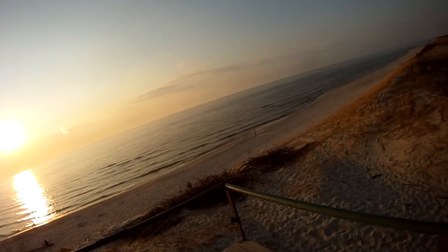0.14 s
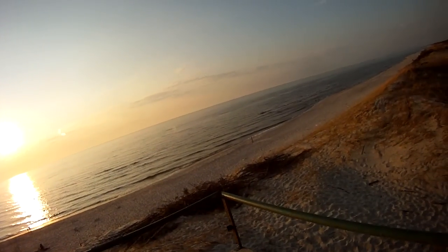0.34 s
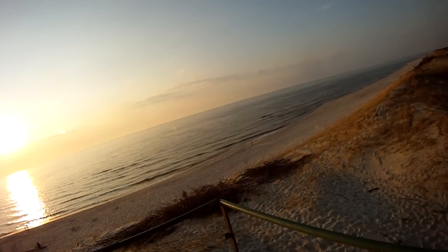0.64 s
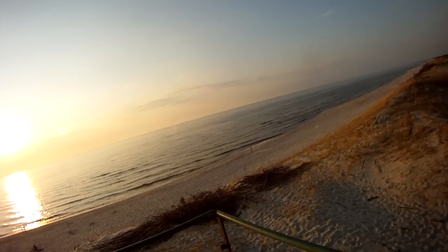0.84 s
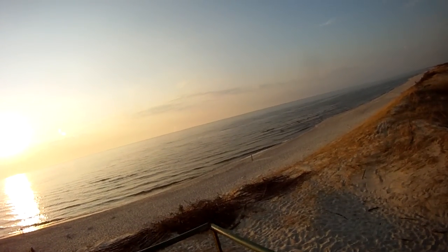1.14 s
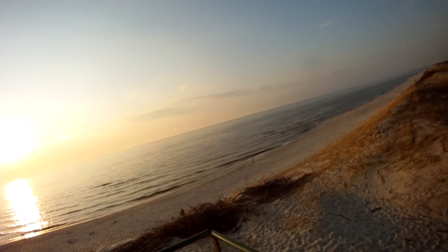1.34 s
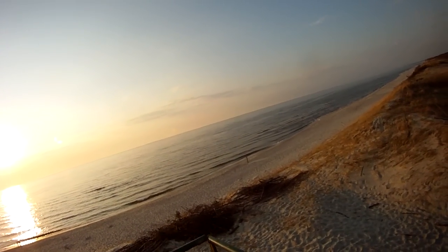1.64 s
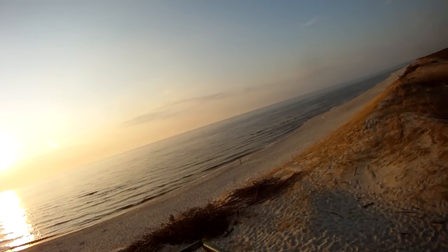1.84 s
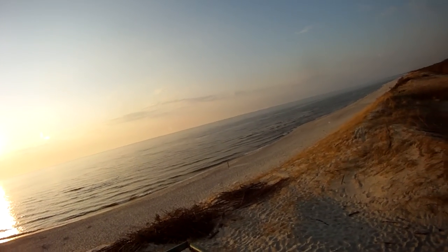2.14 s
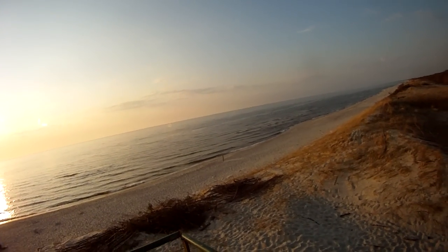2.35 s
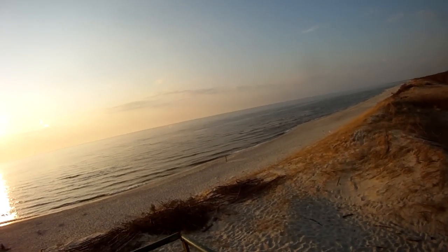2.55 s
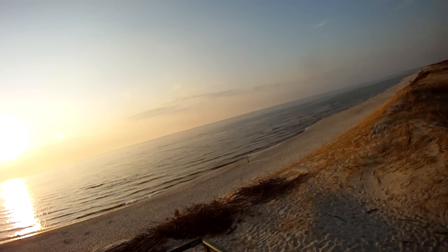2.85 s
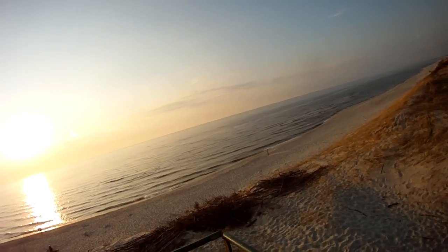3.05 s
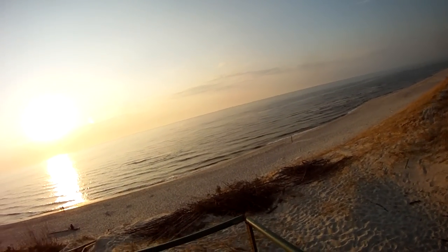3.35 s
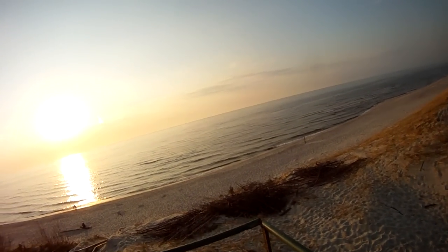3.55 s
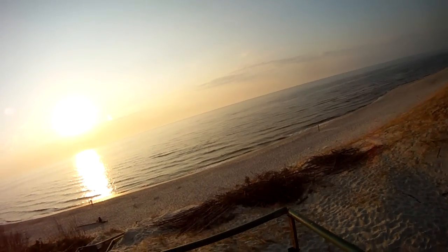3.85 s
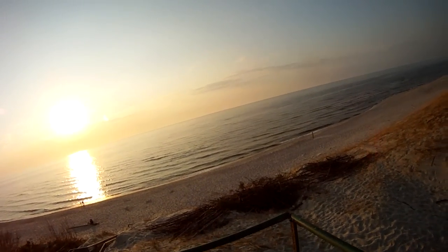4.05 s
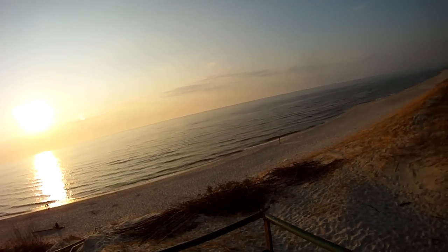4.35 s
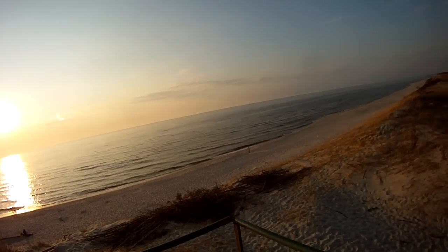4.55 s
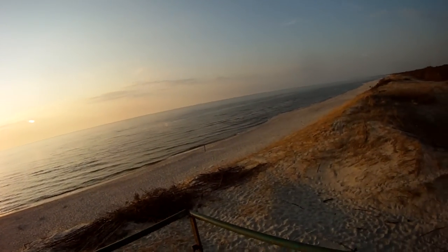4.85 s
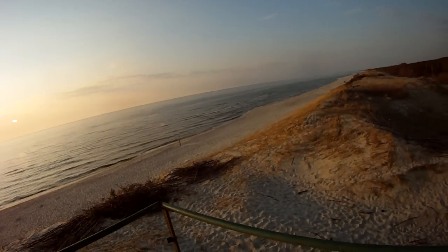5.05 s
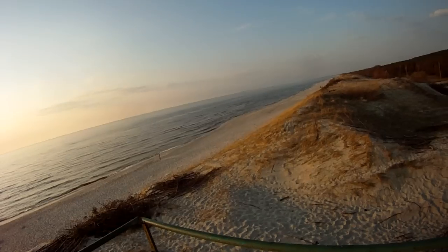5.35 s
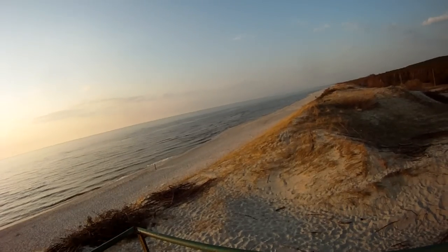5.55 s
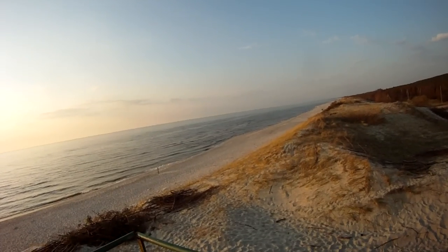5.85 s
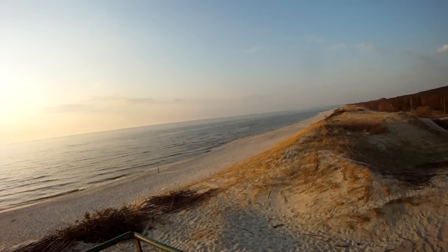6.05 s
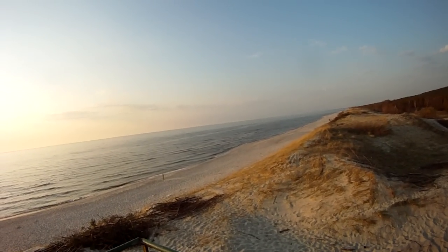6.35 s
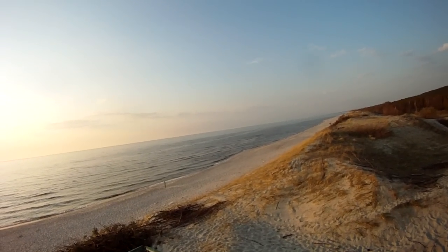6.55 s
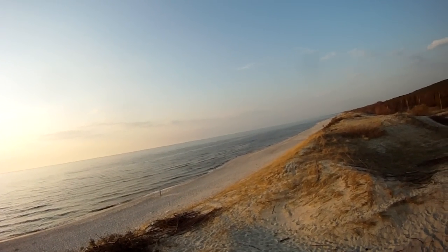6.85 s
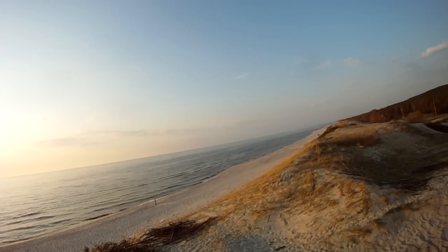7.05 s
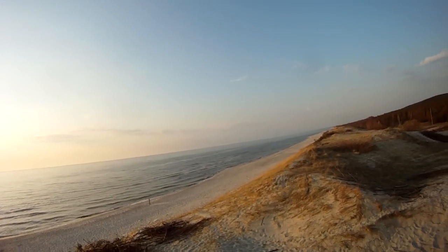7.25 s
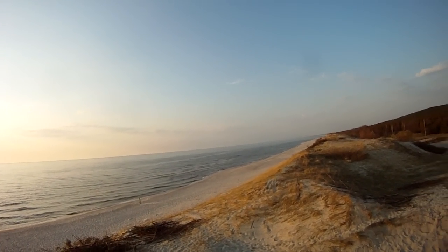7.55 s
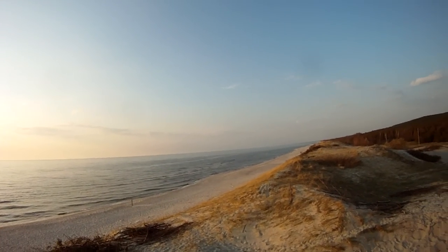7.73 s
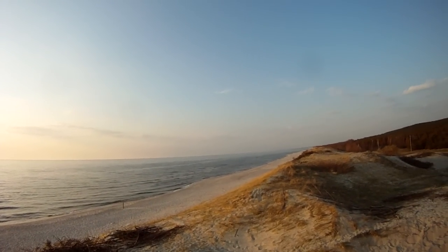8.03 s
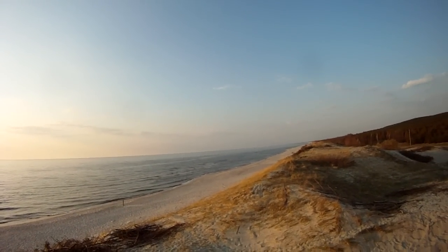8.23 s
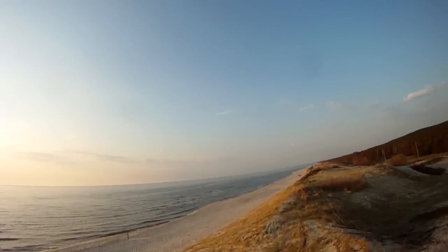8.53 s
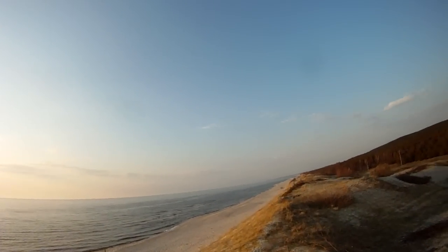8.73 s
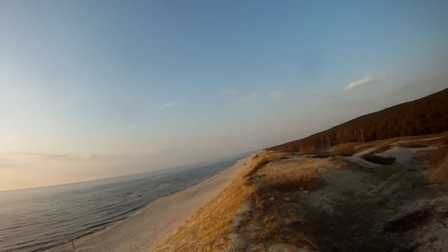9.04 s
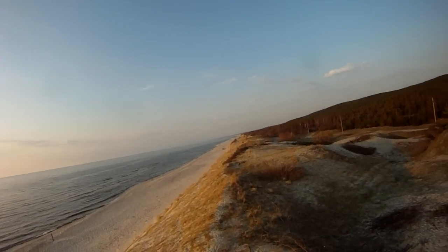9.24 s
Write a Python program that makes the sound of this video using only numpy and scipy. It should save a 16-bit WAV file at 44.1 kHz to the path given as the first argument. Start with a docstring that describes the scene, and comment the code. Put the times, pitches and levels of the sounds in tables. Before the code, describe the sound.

Close microphone mounted on a model aircraft above a windy beach. Soft low wind buffets, air hisses faintly, and servos hum low with scattered dry ticks and thumps. After six seconds the electric motor knocks and stutters, coasts briefly, then spools up with a rising whine, growing rattle and hard chatter, settling into a loud, low, steady propeller buzz.

```python
"""Model aircraft spooling up

A small camera rides on a model aircraft above a windy beach: gusts of noise rumble on the microphone, servos hum and twitch.
The electric motor stutters into motion, coasts down, then spools up; its tones all follow one shaft-speed curve.
The unbalanced propeller rocks the airframe with sines and rattles it with noisy blows; at full speed the rattle eases
and the rocking grows.
The camera samples coarsely and holds each sample, which mirrors the sound upward as a thin sizzle."""
import sys
import numpy as np
from scipy.fft import rfft, irfft, next_fast_len
from scipy.io import wavfile
from scipy.ndimage import uniform_filter1d, minimum_filter1d, map_coordinates

SR = 44100
rng = np.random.default_rng(int(sys.argv[2]) if len(sys.argv) > 2 else 0)


def digitize_waveform(pressure):
    """Quantize a signal to 16-bit integers and store it at the path in sys.argv[1].

    Rows of a 2-D input are taken as channels; values are limited to [-1, 1].
    """
    field = np.atleast_2d(pressure).T
    bounded = np.clip(field, -1, 1)
    quanta = np.round(bounded * 32767).astype(np.int16)
    wavfile.write(sys.argv[1], SR, quanta)


N = 414099


def amp(db):
    """Decibels to gain."""
    return 10 ** (np.asarray(db) / 20)


def unit(x):
    """x at rms 1."""
    return x / np.sqrt(np.mean(x ** 2) + 1e-20)


def steady(x):
    """x with its slow level flattened to about rms 1."""
    power = np.abs(uniform_filter1d(x * x, size=SR // 12))
    return x / np.sqrt(power + 1e-4 * np.mean(x * x))


def curves(rows):
    """One value per sample for each column after the time."""
    s, *cols = np.transpose(rows)
    return [np.interp(np.arange(N) / SR, s, c) for c in cols]


def wobble(rate):
    """A smooth random curve, rate knots a second."""
    knots = rng.standard_normal(int(N * rate / SR) + 4)
    return map_coordinates(knots, [np.arange(N) * rate / SR])


def filtered(x, response):
    """x times a complex response of frequency."""
    m = 2 * next_fast_len(N // 2 + SR // 4)
    return irfft(rfft(x, m) * response(np.fft.rfftfreq(m, 1 / SR)), m)[:N]


def coloured(x, points):
    """x through a causal filter of unit power that follows (f/Hz, level/dB) points."""
    def response(hz):
        f, db = np.transpose(points)
        gain = unit(amp(np.interp(np.log(hz + 1), np.log(f), db)))
        # folding the cepstrum forward gives minimum phase
        cepstrum = irfft(np.log(np.maximum(gain, 1e-6)))
        cepstrum[1:len(hz) - 1] *= 2
        cepstrum[len(hz):] = 0
        return np.exp(rfft(cepstrum))
    return filtered(x, response)


def noise(points):
    """Coloured noise of rms 1."""
    return unit(coloured(rng.standard_normal(N), points))


def bursts(rows, t60):
    """A puff of noise for each (t/s, level/dB), dying by 60 dB in t60 seconds."""
    out, t = np.zeros(N + SR), np.arange(SR // 8) / SR
    for s, db in rows:
        out[round(s * SR):][:len(t)] += amp(db - 60 * t / t60) * rng.standard_normal(len(t))
    return out[:N]


def bell(s, length):
    """A smooth rise and fall that peaks at 1 at time s."""
    t = np.arange(N) / SR
    return np.exp(-(2 * (t - s) / length) ** 2)


def swells(rows):
    """A bell of gain for each (t/s, length/s, level/dB)."""
    return sum(amp(db) * bell(s, length) for s, length, db in rows)


def passes(cycles):
    """A unit pulse wherever the count of cycles passes a whole number."""
    return np.diff(np.floor(cycles), prepend=0)


def octaves_below(speed, hz):
    """How many octaves the shaft rate lies under hz; zero above it."""
    return np.log2(np.maximum(hz / speed, 1))


def octaves_above(speed, hz):
    """How many octaves the shaft rate lies over hz; zero below it."""
    return np.log2(np.maximum(speed / hz, 1))


def near(speed, hz, octaves):
    """A bell that reaches 1 as the shaft rate passes hz."""
    return np.exp(-(np.log2(speed / hz) / octaves) ** 2)


# gusts on the microphone: [t/s of the peak, length/s, level/dB]
GUSTS = [(.02, 0.088, -37.5), (.43, 0.26, -49), (.84, 0.18, -52), (3.56, .12, -50), (4.24, 0.18, -50),
         (4.88, 0.21, -47), (6.04, 0.046, -46)]
# colour of low rumble, in the wind, propeller wash and thumps: [f/Hz, relative level/dB per Hz]
RUMBLE_COLOUR = [(10, -5), (28, -2.5), (55, -4.5), (100, -2), (160, -11), (250, -24.5), (500, -38),
                 (1500, -84.5)]
# airflow along the fuselage: [t/s, level/dB before AIR_GAIN_DB]
AIRFLOW = [(0.0, -55), (1.05, -58), (1.95, -58.5), (2.54, -54.5), (4.52, -58.5), (5.47, -56), (6.2, -56.5)]
# colour of the airflow hiss: [f/Hz, relative level/dB per Hz]
HISS_COLOUR = [(150, -0.5), (480, -8), (800, -1.5), (1090, 1), (1250, -8), (1400, -2.5), (1580, -4.5),
               (2000, -0.5), (2450, -6), (2850, -1), (3330, -13), (3560, -1), (3900, -14.5), (5600, -15)]
BREEZE_DB, BREEZE_SWING_DB = -57, 2.5  # steady breeze; quick swings of breeze and gusts
AIR_GAIN_DB = 2.5  # lifts the whole hiss


def wind():
    """Gusts over a steady breeze buffet the microphone, and air hisses along the fuselage."""
    pressure = amp(BREEZE_DB) + swells(GUSTS)
    buffet = pressure * amp(BREEZE_SWING_DB * wobble(10)) * noise(RUMBLE_COLOUR)
    hiss = amp(curves(AIRFLOW)[0] + AIR_GAIN_DB + 0.17 * wobble(7)) * noise(HISS_COLOUR)
    return buffet + hiss


# servo pulse rate and overtones: [f/Hz, level/dB]
SERVO_HUM = [(45.4, -44.5), (90.8, -44), (136.2, -90), (181.6, -60.5)]
# servo twitches: [t/s, level/dB before trims, thump level/dB relative to it before trims]
TWITCHES = [(0.735, -29, -5), (1.192, -37, -2), (1.237, -34, -4), (1.692, -30, -11), (2.971, -26, 5),
            (2.984, -28, -19), (3.121, -33.5, -8), (3.534, -31.5, -1), (3.56, -32, -11), (4.444, -34.5, 8),
            (4.757, -34, 3), (4.844, -30, -20), (4.861, -35, -1), (4.884, -36, -4), (5.157, -37, -11),
            (5.441, -33, 4)]
# colour of ticks, running gears and mount knocks: [f/Hz, relative level/dB per Hz]
TICK_COLOUR = [(180, -17), (300, -14.5), (560, -5), (810, 0), (950, -10.5), (1100, 3.5), (1250, -5.5),
               (1400, 2), (1700, -12), (2050, -2.5), (2350, -11), (2750, -24.5), (3560, -19), (5600, -55)]
# servo gears running: [t/s of the peak, length/s, level/dB]
SERVO_RUNS = [(.43, 0.18, -56.5), (4.225, 0.22, -53.5), (4.864, 0.16, -56)]


def servos():
    """Servos hum at their pulse rate, tick and thump at small moves and whirr at longer ones."""
    t = np.arange(N) / SR
    hum = np.zeros(N)
    for hz, db in SERVO_HUM:
        phase = 2 * np.pi * (hz * t + rng.random()) + .08 * wobble(9)
        hum += amp(db + .8 * wobble(4)) * np.sin(phase)
    clicks = bursts([(s, db - 10) for s, db, _ in TWITCHES], t60=.02)
    backlash = bursts([(s, db - 11.5) for s, db, _ in TWITCHES], t60=0.065)
    low_bursts = bursts([(s, db + low - 27) for s, db, low in TWITCHES], t60=0.059)
    thumps = coloured(low_bursts, [(30, -12), (110, 3), (200, 10), (500, -31)])
    gears = swells(SERVO_RUNS) * noise(TICK_COLOUR) * amp(2.3 * wobble(150))
    return hum + coloured(clicks + backlash, TICK_COLOUR) + thumps + gears


# a short blip of throttle: [t/s, shaft rate/turns per s]
BLIP = [(6.378, 3.3), (6.44, 3.9), (6.5, 11.4), (6.55, 15.6), (6.6, 17.1), (6.635, 16.95)]
# the full spool-up: [t/s, shaft rate/turns per s]
SPOOL = [(7.13, 9.2), (7.45, 28), (7.8, 38.6), (7.972, 46.14), (8.294, 66.6), (8.426, 69.6), (8.594, 78.4),
         (8.704, 96), (8.88, 113.5), (8.988, 116.2), (9.39, 117)]
COAST_S = .8  # throttle shut, the propeller slows by a factor e in this time


def shaft_speed():
    """Turns per second: a blip of throttle, a free coast, then the spool-up."""
    t = np.arange(N) / SR
    coasting = curves(BLIP)[0] * np.exp(-np.maximum(t - BLIP[-1][0], 0) / COAST_S)
    return np.where(t < SPOOL[0][0], coasting, curves(SPOOL)[0])


WASH_DB = -40


def wash(settled):
    """The slow propeller's wash rumbles on the microphone and fades out towards full speed."""
    return amp(WASH_DB + 4.0 * wobble(13)) * (1 - settled) * noise(RUMBLE_COLOUR)


# colour of the propeller's rush of air: [f/Hz, relative level/dB per Hz]
RUSH_COLOUR = [(400, -2.5), (2500, 0.5), (3600, -1.5), (5600, -1.5)]
RUSH_DB, RUSH_CHOP = -39.5, 0.39  # level at full speed; depth of the pulsing


def rush(turns, settled):
    """Air rushes off the fast propeller, pulsing once a turn."""
    chop = 1 + RUSH_CHOP * np.sin(2 * np.pi * turns)
    return amp(RUSH_DB) * settled * chop * noise(RUSH_COLOUR)


# low thumps of the airframe: [t/s of the peak, length/s, level/dB]
THUMPS = [(7.44, .04, -36), (8.51, 0.016, -18), (8.538, 0.017, -11), (8.61, 0.12, -23)]


def airframe_thumps():
    """The airframe thumps in short swells of low rumble."""
    return swells(THUMPS) * noise(RUMBLE_COLOUR)


# hard fits of chatter near the critical speed: [t/s of the peak, length/s, level/dB]
CHATTER = [(8.274, 0.0056, -14), (8.32, 0.038, -25.5), (8.38, 0.0098, -21.5), (8.475, 0.03, -19),
           (8.5, 0.011, -13.5), (8.512, 0.017, -21), (8.53, 0.032, -23.5)]
# colour of the chatter: [f/Hz, relative level/dB per Hz]
CHATTER_COLOUR = [(200, 8), (420, -28), (900, 12.5), (1400, -20), (1700, 2), (2250, 4.5), (2700, -15.5),
                  (3500, -17.5), (5600, -32)]


def chatter():
    """Hard chatter: brief swells of noise with a fast, rough flutter."""
    return swells(CHATTER) * noise(CHATTER_COLOUR) * amp(1.3 * wobble(400))


# jolts of the motor mount: [t/s, level/dB before an 8 dB cut]
JOLTS = [(6.289, -24), (6.309, -19), (6.346, -24.5), (6.368, -20), (6.381, -25), (6.401, -19), (6.713, -28),
         (6.74, -31), (6.78, -33), (6.852, -31.5), (6.885, -29), (6.935, -33)]
# colour of the motor mount when the rotor jerks: [f/Hz, relative level/dB per Hz]
JERK_COLOUR = [(40, -9), (130, 5), (200, -7), (268, 3), (340, -3), (470, -21.5), (560, 4.5), (645, 4),
               (740, -9.5), (1100, -8), (1700, -22), (2100, -7), (2600, -42.5), (5600, -42.5)]


def mount_jolts():
    """Each jolt of the mount is a short knock over a longer thud."""
    hits = [(s, db - 8.0) for s, db in JOLTS]
    knocks = coloured(bursts(hits, t60=0.017), TICK_COLOUR)
    thuds = coloured(bursts(hits, t60=0.093), JERK_COLOUR)
    return knocks + thuds


STUTTER_DB, STUTTER_ATTACK_S, STUTTER_DB_PER_S = -27, 0.017, 40  # jerky start, dying away


def stutter(turns):
    """Each of the 42 commutations a turn jerks the rotor at random to either side, fading steadily from the start."""
    age = np.maximum(np.arange(N) / SR - BLIP[0][0], 0)
    envelope = np.minimum(age / STUTTER_ATTACK_S, 1) * amp(STUTTER_DB - STUTTER_DB_PER_S * age)
    kicks = passes(42 * turns) * np.sign(wobble(300)) * amp(2 * wobble(200))
    return envelope * steady(coloured(kicks, JERK_COLOUR))


# fuselage resonances: [f/Hz, width/Hz, relative level/dB]
FUSELAGE_MODES = [(118, 67, -2), (285, 69, -5.5), (562.5, 23.6, -0.5), (626, 7.9, 4), (790, 73, 7),
                  (1082, 177, 0.5), (1374, 67, 2), (2104, 69, -14), (2360, 130, -18), (3840, 128.8, -39)]


def airframe(x):
    """x through the resonances of the fuselage, summed with alternating sign."""
    def response(f):
        total = 0
        for k, (centre, width, db) in enumerate(FUSELAGE_MODES):
            damping = 1j * f * width
            total = total + (-1) ** k * amp(db) * damping / (centre * centre - f * f + damping)
        return total
    return filtered(x, response)


# magnets passing the stator: [multiple of the shaft rate, coasting and driven relative level/dB]
WHINE_ORDERS = [(14, -10, -5), (24, -10, -5), (28, -1, -13), (32, -30, -7), (36, -3, -14), (42, -18, 0),
                (44, -22, -5), (48, 0, -16), (66, -22, -14), (84, -14, -10)]
FULL_DRIVE = 64  # shaft acceleration under full current (turns per second, per second)
WHINE_DB, WHINE_FULL_HZ, WHINE_DB_PER_OCTAVE = -25.5, 18.8, 12.5  # grows up to this shaft rate
WHINE_FADE_HZ, WHINE_FADE_DB_PER_OCTAVE = 37.6, 26  # and fades above this one
COGGING_DB, COGGING_HZ, COGGING_OCTAVES = -54, 43.7, .3  # a thin whistle around this shaft rate


def whine(turns, speed):
    """Magnets sing past the stator, on other multiples of the shaft rate under power than when coasting."""
    acceleration = uniform_filter1d(np.gradient(speed) * SR, size=SR // 20)
    drive = np.clip(acceleration / FULL_DRIVE, 0, 1)
    level_db = (WHINE_DB - WHINE_DB_PER_OCTAVE * octaves_below(speed, WHINE_FULL_HZ)
                - WHINE_FADE_DB_PER_OCTAVE * octaves_above(speed, WHINE_FADE_HZ))
    angle = 2 * np.pi * turns + .005 * wobble(45)
    tones = np.zeros(N)
    for order, coast, driven in WHINE_ORDERS:
        db = coast + drive * (driven - coast) + 2.5 * wobble(70)
        tones += amp(db) * np.sin(order * angle + .25 * wobble(110))
    whistle = amp(COGGING_DB + 4.5 * wobble(35)) * np.sin(84 * angle + .6 * wobble(120))
    # the fuselage passes little treble
    skin = filtered(airframe(tones), lambda hz: 1 / (1 + (hz / 2400) ** 8))
    return amp(level_db) * steady(skin) + near(speed, COGGING_HZ, COGGING_OCTAVES) * whistle


# the rattle while labouring: [f/Hz, relative level/dB per Hz]
SLOW_RATTLE_COLOUR = [(120, -1.5), (260, -14), (380, -13), (560, 1), (830, 2), (930, -5.5), (1110, 8),
                      (1230, -5.5), (1370, 3), (1620, -14.5), (2050, -6.5), (2350, -19), (2700, -32),
                      (3200, -42.5), (3580, -33.5), (4000, -46.5), (5600, -50.5)]
# the rattle at full speed: [f/Hz, relative level/dB per Hz]
FAST_RATTLE_COLOUR = [(150, -18), (300, -22), (410, -33.5), (540, -25), (780, -18), (1110, -6.5),
                      (1220, -13), (1350, -5), (1520, -17), (1780, -19.5), (2170, -12), (2450, -28.5),
                      (3200, -43.5), (3580, -35.5), (4000, -47.5), (5600, -53.5)]
RATTLE_DB, RATTLE_FULL_HZ, RATTLE_DB_PER_OCTAVE = -15.5, 39, 11  # grows up to this shaft rate
BREAK_LOOSE_HZ, BREAK_LOOSE_DB = 27.6, 4  # parts lift off their seats and the rattle steps up
RATTLE_CALM_DB = 10  # lost above the critical speed
RATTLE_DULL_HZ, RATTLE_BRIGHT_HZ = 37.5, 86  # between these shaft rates the rattle turns brighter
RATTLE_FLUTTER_DB = 0.7  # unevenness, scaled from 1.5 times down to 0.5 at full speed


def rattle(turns, speed, calm, settled, count=9):
    """Loose parts strike at the same places in every turn, each blow a little off in time and size."""
    seated = np.clip(BREAK_LOOSE_HZ - speed, 0, 1)
    level_db = (RATTLE_DB - RATTLE_DB_PER_OCTAVE * octaves_below(speed, RATTLE_FULL_HZ)
                - BREAK_LOOSE_DB * seated - RATTLE_CALM_DB * calm)
    places = (np.arange(count) + rng.random(count)) / count
    blows = np.zeros(N)
    for k, place in enumerate(places):
        hits = passes(np.maximum(turns - place + .014 * wobble(90), 0))
        blows += hits * amp(2.6 * wobble(90)) * (-1) ** k
    scrape = rng.standard_normal(N) * amp(1.56 * wobble(160))
    force = (steady(blows) + 1.42 * scrape) * (1 + 0.14 * np.sin(2 * np.pi * turns))
    bright = np.clip((speed - RATTLE_DULL_HZ) / (RATTLE_BRIGHT_HZ - RATTLE_DULL_HZ), 0, 1)
    slow = unit(coloured(force, SLOW_RATTLE_COLOUR))
    fast = unit(coloured(force, FAST_RATTLE_COLOUR))
    hard = (1 - bright) * slow + bright * fast
    # gentle contacts mostly wake the low modes
    soft = unit(filtered(airframe(force), lambda hz: 1 / (1 + 1j * hz / 1300)))
    hardness = np.clip((level_db + 38.0) / 14, 0, 1)
    flutter_db = RATTLE_FLUTTER_DB * (1.5 - settled) * wobble(22)
    return amp(level_db + flutter_db) * steady(hardness * hard + (1 - hardness) * soft)


# brief dips of the rocking: [t/s of the deepest point, length/s, depth/dB]
FALTERS = [(8.25, 0.051, 5.5), (8.497, .07, 6), (8.58, .07, 5)]
# overtones of the shaking while labouring: [multiple of the shaft rate, relative level/dB]
SHAKE_ORDERS = [(2, -4.5), (3, -1), (4, -6), (5, -21), (6, -17)]
# the same overtones at full speed: [multiple of the shaft rate, relative level/dB]
FAST_SHAKE_ORDERS = [(2, 3), (3, 3), (4, -21), (5, -27), (6, -23)]
# how the motor mount passes the shaking: [f/Hz, relative level/dB]
MOUNT_RESPONSE = [(40, -25), (80, 1.5), (105, 2.5), (130, -2), (200, 2), (230, -11), (265, 7), (310, -3),
                  (360, -5), (420, -11), (600, -21), (1000, -33)]
ROCK_DB, ROCK_FULL_HZ, ROCK_DB_PER_OCTAVE = -20, 36.2, 34.5  # grows up to this shaft rate
SWAY_DB, SWAY_HZ, SWAY_OCTAVES = 4, 39.6, 0.09  # the airframe sways in sympathy around this shaft rate
ROCK_JUMP_HZ, ROCK_JUMP_DB = 66.6, 4.5  # the rocking jumps up at this shaft rate
ROCK_SETTLED_DB = 1.75  # and grows a little more towards full speed
OVERTONE_DB, OVERTONE_FULL_HZ, OVERTONE_DB_PER_OCTAVE = -23.5, 31.3, 55  # overtones set in abruptly
OVERTONE_FADE_HZ, OVERTONE_FADE_DB_PER_OCTAVE = 73.6, 28  # and fade above this shaft rate


def shake(turns, speed, settled):
    """The unbalanced propeller rocks the aircraft once a turn, with overtones that fade at high speed."""
    falter_db = sum(depth * bell(s, length) for s, length, depth in FALTERS)
    rocking_db = (ROCK_DB - ROCK_DB_PER_OCTAVE * octaves_below(speed, ROCK_FULL_HZ)
                  + SWAY_DB * near(speed, SWAY_HZ, SWAY_OCTAVES)
                  + ROCK_JUMP_DB * np.clip(speed - ROCK_JUMP_HZ + 1, 0, 1)
                  + ROCK_SETTLED_DB * settled - falter_db)
    overtone_db = (OVERTONE_DB - OVERTONE_DB_PER_OCTAVE * octaves_below(speed, OVERTONE_FULL_HZ)
                   - OVERTONE_FADE_DB_PER_OCTAVE * octaves_above(speed, OVERTONE_FADE_HZ))
    angle = 2 * np.pi * turns
    rocking = amp(rocking_db + .3 * wobble(5.4)) * np.sqrt(2) * np.sin(angle)
    overtones = np.zeros(N)
    for (order, slow), (_, fast) in zip(SHAKE_ORDERS, FAST_SHAKE_ORDERS):
        db = slow + settled * (fast - slow) + (4 - 2 * settled) * wobble(16)
        overtones += amp(db) * np.sin(order * angle + 2 * np.pi * rng.random() + .4 * wobble(30))
    return rocking + amp(overtone_db) * steady(coloured(overtones, MOUNT_RESPONSE))


CRITICAL_HZ, CALM_HZ = 64.4, 76.1  # between these shaft rates the rattling eases


def motor():
    """The turning parts follow the shaft; jolts, chatter and thumps come at set times."""
    speed = shaft_speed()
    running = np.arange(N) / SR > BLIP[0][0]
    turns = np.cumsum(speed * running) / SR
    calm = np.clip((speed - CRITICAL_HZ) / (CALM_HZ - CRITICAL_HZ), 0, 1)
    # 0 up to 50 turns a second, 1 from 96
    settled = np.clip((speed - 50) / 46, 0, 1) ** 2
    air = wash(settled) + rush(turns, settled)
    drive_sound = stutter(turns) + whine(turns, speed)
    vibration = rattle(turns, speed, calm, settled) + shake(turns, speed, settled)
    knocking = airframe_thumps() + chatter() + mount_jolts()
    return running * (air + drive_sound + vibration) + knocking


def scene():
    """One microphone feeds both channels."""
    return np.tile(wind() + servos() + motor(), (2, 1))


CEILING = .75  # limiter ceiling (share of full scale)
HOLD_HZ, TOP_HZ = 12000, 15200  # coarse sampling rate; nothing passes from TOP_HZ up


def record(dry):
    """A limiter ducks the highest peaks; holding coarse samples mirrors the sound around their rate."""
    needed = CEILING / np.maximum(np.abs(dry[0]), CEILING)
    limited = dry[0] * uniform_filter1d(minimum_filter1d(needed, size=241), size=121)
    narrow = filtered(limited, lambda hz: 1 / np.sqrt(1 + (hz / 5550) ** 50))
    mirrored = narrow * (1 + 2 * np.cos(2 * np.pi * HOLD_HZ * np.arange(N) / SR))
    # a held sample weakens the treble as a sinc
    held = filtered(mirrored, lambda hz: np.sinc(hz / HOLD_HZ) * (hz < TOP_HZ))
    return np.tile(held, (2, 1))


dry = scene()
out = record(dry)
digitize_waveform(out)
```